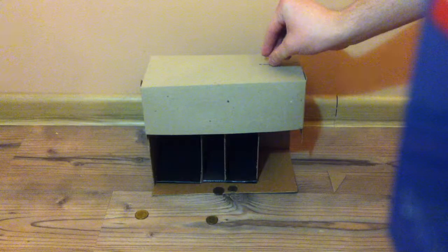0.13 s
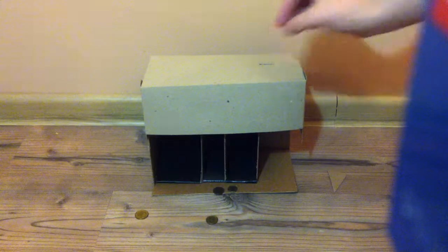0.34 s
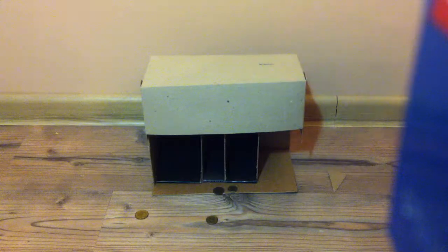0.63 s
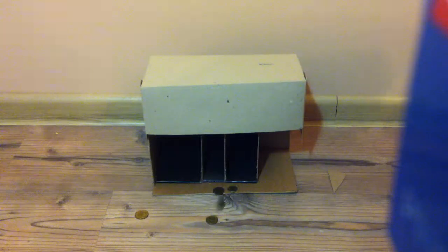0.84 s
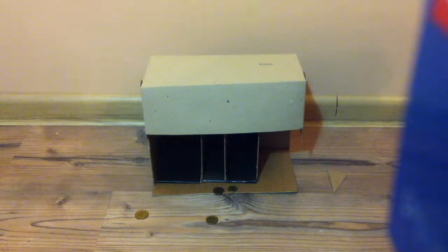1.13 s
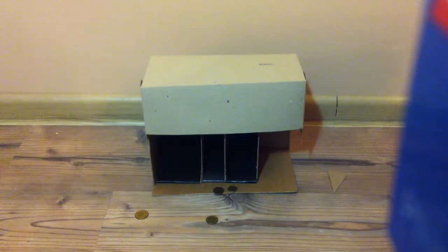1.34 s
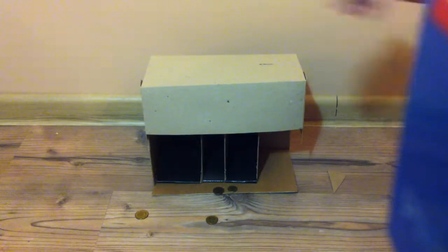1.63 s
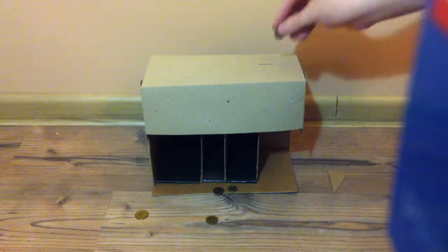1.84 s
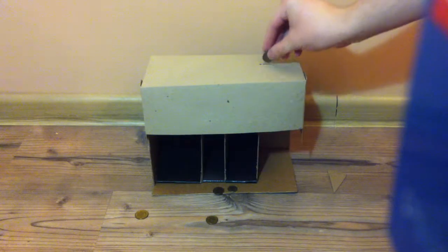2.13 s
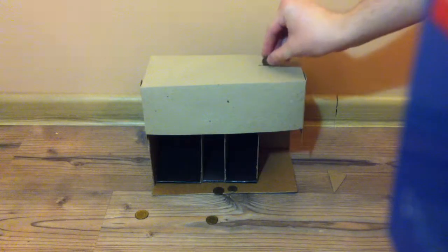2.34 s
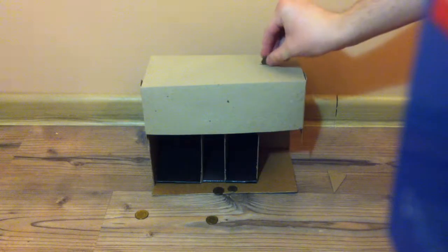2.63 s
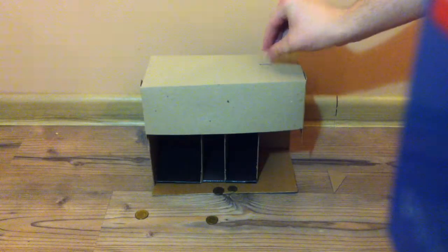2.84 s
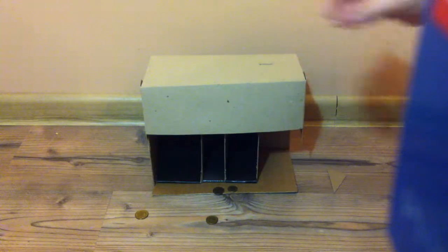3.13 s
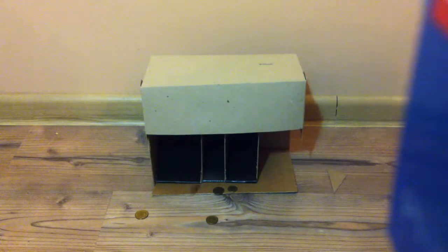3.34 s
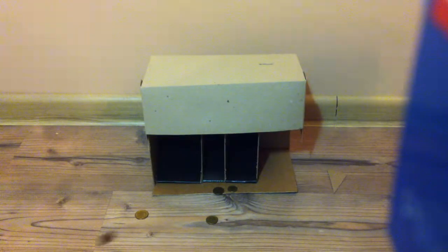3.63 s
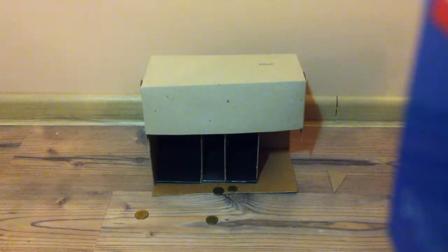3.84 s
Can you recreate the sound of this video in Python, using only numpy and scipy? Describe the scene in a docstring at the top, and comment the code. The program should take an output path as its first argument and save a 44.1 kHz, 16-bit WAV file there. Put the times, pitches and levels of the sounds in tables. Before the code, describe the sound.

A coin taps softly inside a cardboard box from 0 s, with hollow knocks clustering around 0.75-0.9. It lands on wooden boards at about 1.0, bouncing in sharp ticks and rolling with a faint metallic ring until 1.6. Sparse faint taps follow, then light knocks near 2.9. A louder second coin clatters at 3.25-3.45, lands at 3.5 and rolls, with strong boxy knocks near 3.95. Small room, low hiss.

```python
"""A coin knocks and slides through a cardboard box, drops on a wooden floor, bounces and rolls away; then a second
coin does the same. A small room answers, over a hissy microphone with a faint whine.
Clicks and grit ring the modes of the cardboard, the boards and the coin; each blow adds a low thump.
The room is a decaying noise tail, the hiss is shaped noise and the whine is narrow noise."""
import sys
import numpy as np
from scipy import signal
from scipy.fft import rfft, irfft
from scipy.io import wavfile
from scipy.ndimage import uniform_filter1d

SR = 44100
rng = np.random.default_rng(int(sys.argv[2]) if len(sys.argv) > 2 else 0)


def bounce(signal):
    """Save signal as a 16-bit WAV file at the path given by the first command-line argument."""
    frames = np.transpose(np.atleast_2d(signal))
    limited = np.clip(frames, -1, 1)
    pcm = np.round(limited * 32767).astype(np.int16)
    wavfile.write(sys.argv[1], SR, pcm)


N = 176400   # samples

# Microphone hiss spectrum. Each row: frequency in Hz, relative level in dB.
HISS_SPECTRUM = [(24, -68), (40, -40), (98, 1), (154, -4.5), (294, -4), (861, -5.5), (1020, -12.5),
                 (1160, -7.5), (1770, -9), (2780, -12.5), (3230, -11.5), (15600, -17.5)]
# Sliding and rustle inside the box, one list per stretch. Each row: time in seconds, level in dB.
SLIDES = [
    [(0, -53), (.08, -68), (.2, -67), (.45, -71), (.73, -72)],
    [(.73, -54), (.78, -51.5), (.85, -72), (.89, -53), (.97, -65.5)],
    [(2.85, -72.5), (3.0, -73.5), (3.23, -68), (3.27, -56), (3.42, -65.5), (3.5, -46)],
]
# Coin against cardboard. Each row: start in seconds, level of the middle panels, low panels and small flaps
# in dB, decay of the contact in seconds, pitch of the struck panel in Hz, pitch of the struck flap in Hz.
BOX_KNOCKS = [(.004, -63, -44, -75, 0.0058, 230, 2540), (.063, -57, -67, -47.5, 0.02, 307.2, 3160),
              (0.227, -59, -44, -52, 0.01, 222, 2380), (.258, -53, -39, -41.5, 0.0048, 467, 2830),
              (.277, -52, -35.5, -39.5, 0.0029, 406, 2680), (.288, -44.5, -46, -43.5, 0.014, 480, 2750),
              (0.377, -66, -45.5, -52.5, 0.012, 344, 2850), (0.562, -68, -54.5, -64, 0.0069, 353, 2620),
              (.623, -78, -52, -77, 0.0082, 302, 1880), (.733, -58, -47, -46, 0.01, 470, 2490),
              (.742, -46.5, -65, -39.5, .008, 544, 2900), (.759, -35.5, -46, -40.5, 0.025, 563, 2530),
              (.788, -37.5, -37.5, -33.5, .003, 592, 2540), (0.807, -46, -35, -40, 0.018, 238, 1910),
              (.902, -34.5, -44, -38.5, 0.0069, 646, 2400), (.913, -33.5, -32, -29.5, 0.013, 520, 4370),
              (1.775, -66, -58, -80, 0.0065, 505, 1900), (1.834, -60.5, -60.5, -62, 0.012, 480, 1860),
              (2.298, -58, -45.5, -57.5, 0.011, 220, 2720), (2.526, -72, -53.5, -74, 0.0063, 284, 2470),
              (2.827, -75, -55, -76, .007, 280, 1960), (2.896, -55.5, -38, -40.5, 0.0075, 430, 2900),
              (2.917, -44, -34.5, -36, 0.012, 410, 1870), (3.0, -57, -46.5, -70, 0.0075, 352, 1890),
              (3.108, -73, -61, -81, .007, 388, 2830), (3.251, -33.5, -39.5, -31, 0.015, 440, 3000),
              (3.330, -23, -27.5, -33, 0.0022, 484, 2500), (3.34, -29, -33.5, -54, 0.0044, 500, 1900),
              (3.442, -35, -33.5, -36.5, 0.0092, 550, 1820), (3.451, -43.5, -36, -40.5, 0.012, 516, 2670),
              (3.943, -41, -28, -45, 0.0045, 450, 2440), (3.951, -31, -27, -33.5, 0.0017, 646, 2380),
              (3.962, -37, -40, -41, .014, 640, 2940)]
# Resonances of the cardboard. Each row: frequency in Hz, relative level in dB.
BOX_MODES = [(218, -9.5), (283, -6.5), (360, -1), (430, -4.5), (492, -1), (558, -2.5), (650, -1.5),
             (715, -8), (790, -4.5), (888, -1.5), (972, -1), (1063, -2.5), (1205, -4), (1345, -3.5),
             (1510, -3), (1640, -5.5), (1870, -2.5), (2230, -2.5), (2600, -1), (2800, -2), (3250, -3),
             (4000, -6.5), (4800, -6.5), (5800, -9), (7200, -12)]
# Reverberation of the room. Each row: band centre in Hz, time to fall by 60 dB in seconds.
ROOM_DECAYS = [(250, 0.51), (700, 0.31), (2000, 0.34), (5000, 0.4), (12000, 0.099)]
# Coin running on its rim, one list per coin. Each row: time in seconds, rumble, grit and fine sizzle in dB.
RIM_ROLLS = [
    [(.975, -78, -61, -83), (1.07, -55, -58.5, -65), (1.15, -53, -55, -70.5), (1.3, -60, -64.5, -70.5),
     (1.42, -61.5, -62, -66.5), (1.54, -61, -62, -69), (1.59, -71, -101, -97), (1.66, -86, -88, -92)],
    [(3.51, -53, -66, -88), (3.58, -57.5, -98, -83), (3.68, -56.5, -59, -77), (3.74, -54.5, -55, -59.5),
     (3.81, -57, -59.5, -91), (3.92, -57.5, -58.5, -73), (4, -57, -58, -73)],
]
# Coin landing on the boards. Each row: start in seconds, tick level in dB.
LANDINGS = [(0.9806, -25), (1.0034, -41), (1.035, -31.5), (1.0464, -38), (1.0959, -28.5), (1.1114, -33.5),
            (1.1353, -43), (1.1613, -34.5), (1.2106, -34), (1.261, -33), (1.3204, -32), (1.4027, -32),
            (1.4114, -51.5), (1.4701, -38), (3.5135, -27), (3.5488, -31.5), (3.5778, -34), (3.5994, -38.5),
            (3.6147, -37), (3.7723, -40)]
# Resonances of the floorboards. Each row: frequency in Hz, relative level in dB.
BOARD_MODES = [(220, -11), (283, -1.5), (348, 0), (480, -1), (570, 2), (760, 6), (950, 5.5), (1250, 6),
               (1620, -14.5), (2050, -11), (2600, -6.5), (3300, -2), (4100, 1.5), (4900, 1.5), (6100, -1),
               (7500, -4), (9000, -12.5)]
# The coin's own ring. Each row: start in seconds, level in dB, decay of the contact in seconds.
COIN_RINGS = [(1.128, -67, 0.028), (1.165, -53.5, 0.028), (1.403, -53.5, .012), (3.57, -58, 0.007)]
# Resonances of the coin. Each row: frequency in Hz, relative level in dB.
COIN_MODES = [(11320, 2), (11700, -9.5), (12150, -11)]

HISS_DB = -70
WHINE_HZ, WHINE_WIDTH_HZ, WHINE_DB = 1066, 37, -80
BOX_PARTS_HZ = ((680, 1750), (0, 680), (1750, SR))   # middle panels, low panels, small flaps
SLIDE_PER_S, SLIDE_SPREAD_DB = 1500, 4.4
SLIDE_PARTS_DB = (-6, 0, -12)   # middle panels, low panels, small flaps
CHATTER_PER_S, CHATTER_SPREAD_DB = 6000, 1.5
RISE_S = .001   # a contact builds up over this time
STRUCK_DB, STRUCK_Q = 7.5, 4.9   # the struck part speaks this much louder than the rest
THUMP_HZ, THUMP_DB = 39.6, -46   # the floor shakes the microphone; level relative to the blow
ROOM_DB, ROOM_GAP_S = -6, 0.0094   # the tail swells in over the gap
BOARD_PARTS_HZ = ((0, 1450), (1450, SR))   # low boards, high boards
ROLL_PER_S, ROLL_SPREAD_DB, WOBBLE_DB, WOBBLE_HZ = 4000, 4, 1.8, 70
LANDING_S, THUD_DB = 0.0088, -13   # decay of the contact; thud relative to its tick
# 60 dB decay in seconds at 1 kHz, then the power of pitch by which it shortens
BOX_T60, BOARDS_T60, COIN_T60 = (.032, 1.1), (.018, 1.7), (0.087, 0)
PANEL_CUT_HZ = 163   # small panels give off no deep bass
CUTOFF_HZ = 15880
OFFSET = -1e-4   # steady offset of the converter


def amp(db):
    """Turn dB into gain."""
    return 10 ** (np.asarray(db) / 20)


def rms_one(x):
    """Scale to rms 1."""
    return x / np.sqrt(np.mean(x ** 2) + 1e-20)


def body(drive, modes, decay, low_hz=0, high_hz=SR):
    """Ring the modes between two pitches in parallel, signs alternating; a unit click peaks at 1."""
    unit_click = np.arange(N) == 0
    both = np.stack([drive + 1e-18, unit_click])
    t60_1k, power = decay
    chosen = [mode for mode in modes if low_hz <= mode[0] < high_hz]
    out = 0
    for k, (hz, db) in enumerate(chosen):
        t60 = t60_1k * (1000 / hz) ** power
        r = amp(-60 / (t60 * SR))   # loss per sample
        w = 2 * np.pi * hz / SR
        ring = signal.lfilter([0, amp(db) * np.sin(w)], [1, -2 * r * np.cos(w), r * r], both)
        out = out + (-1) ** k * ring
    return out[0] / np.abs(out[1]).max()


def grit(per_s, spread_db):
    """Scatter random clicks of uneven size and sign; rms 1."""
    sizes = amp(spread_db * np.minimum(rng.exponential(1, N), 4))
    signs = rng.choice([-1, 1], N)
    return rms_one(sizes * signs * (rng.random(N) < per_s / SR))


def contacts(times, level_db, lengths, chatter, pitches=None):
    """Make each contact a click and a dying flurry of unit energy, favour any struck pitch, then set its level."""
    out = np.zeros(N + SR)
    for k, (s, db, length) in enumerate(zip(times, level_db, np.maximum(lengths, 1e-4))):
        start = int(s * SR)
        t = np.arange(int((5 * length + .03) * SR)) / SR
        envelope = np.exp(-t / length) * (1 - np.exp(-t / RISE_S))
        flurry = chatter[(start + np.arange(len(t))) % N] * envelope
        flurry[int(RISE_S * SR)] += 7.0   # the click
        flurry = flurry / np.sqrt(np.sum(flurry ** 2))
        if pitches is not None:
            struck = signal.lfilter(*signal.iirpeak(pitches[k], STRUCK_Q, fs=SR), flurry)
            flurry = struck + amp(-STRUCK_DB) * flurry
        out[start:start + len(t)] += amp(db) * flurry
    return out[:N]


def stretches(tables, column):
    """Draw the gain along several stretches of time, silent between them, with softened corners."""
    t = np.arange(N) / SR
    gain = 0
    for table in tables:
        rows = np.array(table)
        gain = gain + amp(np.interp(t, rows[:, 0], rows[:, column], left=-200, right=-200))
    return uniform_filter1d(gain, size=300)


def narrow_noise(hz, width_hz):
    """Pass noise through a narrow band; rms 1."""
    edges = [hz - width_hz / 2, hz + width_hz / 2]
    sos = signal.butter(2, edges, "band", fs=SR, output="sos")
    return rms_one(signal.sosfilt(sos, rng.standard_normal(2 * N))[N:])   # the settled half


def background():
    """Microphone hiss is noise shaped by a spectrum; a narrow band of noise makes the faint whine."""
    hz, db = np.transpose(HISS_SPECTRUM)
    bins_hz = np.arange(N // 2 + 1) * SR / N
    shape = amp(np.interp(np.log(bins_hz + 1), np.log(hz), db))
    hiss = rms_one(irfft(rfft(rng.standard_normal(N)) * shape, N))
    whine = narrow_noise(WHINE_HZ, WHINE_WIDTH_HZ)
    return amp(HISS_DB) * hiss + amp(WHINE_DB) * whine


def sliding():
    """Rubbing grit excites the middle, low and small parts of the box, each to its own degree."""
    rub = grit(SLIDE_PER_S, SLIDE_SPREAD_DB)
    gain = stretches(SLIDES, column=1)
    out = 0
    for part, db in zip(BOX_PARTS_HZ, SLIDE_PARTS_DB):
        out = out + amp(db) * gain * rms_one(body(rub, BOX_MODES, BOX_T60, *part))
    return out


def room(x):
    """Reflections form a dense noise tail of unit energy that dies band by band."""
    t = np.arange(SR // 2) / SR
    tail = 0
    for hz, t60 in ROOM_DECAYS:
        sos = signal.butter(2, [hz / 1.7, min(hz * 1.6, 19000)], "band", fs=SR, output="sos")
        band = signal.sosfilt(sos, rng.standard_normal(len(t)))
        tail = tail + band * amp(-60 * t / t60) / np.sqrt(t60)
    tail = tail * np.clip(t / ROOM_GAP_S, 0, 1) ** 2
    return signal.fftconvolve(x, tail / np.sqrt(np.sum(tail ** 2)))[:N]


def knocks():
    """Coin contacts ring three parts of the box; the low panels and flaps favour the pitch that is struck."""
    s, *levels, length, panel_hz, flap_hz = np.transpose(BOX_KNOCKS)
    chatter = grit(CHATTER_PER_S, CHATTER_SPREAD_DB)
    out = 0
    for part, db, pitches in zip(BOX_PARTS_HZ, levels, (None, panel_hz, flap_hz)):
        hits = contacts(s, db, length, chatter, pitches)
        out = out + body(hits, BOX_MODES, BOX_T60, *part)
    return out


def thumps():
    """Every knock and landing also sends a short low push through the floor, one damped mode."""
    blows = [row[:2] for row in list(BOX_KNOCKS) + list(LANDINGS)]   # knocks follow their middle-panel level
    s, db = np.transpose(blows)
    clicks = np.zeros(N)
    clicks[(s * SR).astype(int)] = amp(db + THUMP_DB)
    push = body(clicks, [(THUMP_HZ, 0)], (.08, 0))
    return signal.sosfilt(signal.butter(2, 2 * THUMP_HZ, fs=SR, output="sos"), push)


def rolling():
    """The rim's wobbling grit excites the boards as rumble and grit; its own treble is the sizzle."""
    sos = signal.butter(2, WOBBLE_HZ, fs=SR, output="sos")
    wobble = rms_one(signal.sosfilt(sos, rng.standard_normal(N)))
    rim = grit(ROLL_PER_S, ROLL_SPREAD_DB) * amp(WOBBLE_DB * wobble)
    treble = signal.sosfilt(signal.butter(4, 8000, "high", fs=SR, output="sos"), rim)
    out = stretches(RIM_ROLLS, column=3) * rms_one(treble)
    for column, part in enumerate(BOARD_PARTS_HZ, start=1):
        out = out + stretches(RIM_ROLLS, column) * rms_one(body(rim, BOARD_MODES, BOARDS_T60, *part))
    return out


def landings():
    """Each bounce strikes the boards: a thud in the low modes under a tick in the high ones."""
    s, tick_db = np.transpose(LANDINGS)
    chatter = grit(CHATTER_PER_S, CHATTER_SPREAD_DB)
    out = 0
    for db, part in zip((tick_db + THUD_DB, tick_db), BOARD_PARTS_HZ):
        hits = contacts(s, db, np.full(len(s), LANDING_S), chatter)
        out = out + body(hits, BOARD_MODES, BOARDS_T60, *part)
    return out


def coin_ring():
    """Now and then a contact sets the coin's own high modes ringing."""
    hits = contacts(*np.transpose(COIN_RINGS), grit(CHATTER_PER_S, CHATTER_SPREAD_DB))
    return body(hits, COIN_MODES, COIN_T60)


def scene():
    """Box, floor and coin lose their deep bass and sound in the room, over thumps and background."""
    near = sliding() + knocks() + rolling() + landings() + coin_ring()
    near = signal.sosfilt(signal.butter(4, PANEL_CUT_HZ, "high", fs=SR, output="sos"), near)
    return (near + amp(ROOM_DB) * room(near) + thumps() + background())[None]


def record(dry):
    """A steep filter cuts the top and the converter adds its offset."""
    return signal.sosfilt(signal.cheby2(24, 50, CUTOFF_HZ, fs=SR, output="sos"), dry) + OFFSET


dry = scene()
out = record(dry)
bounce(out)
```